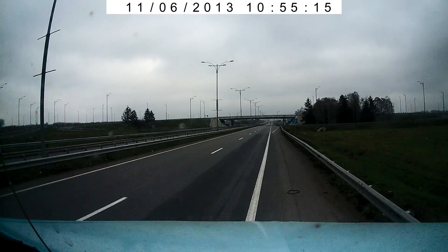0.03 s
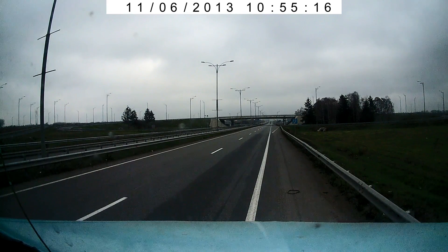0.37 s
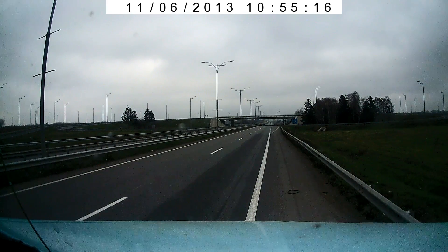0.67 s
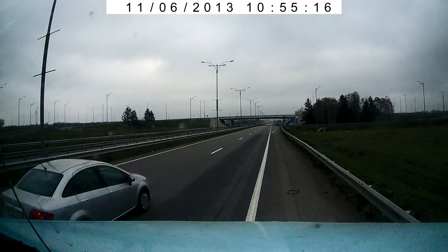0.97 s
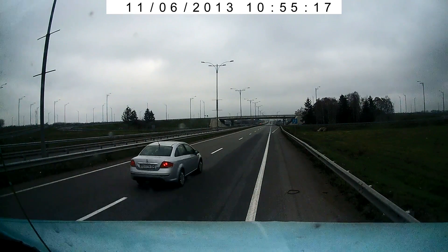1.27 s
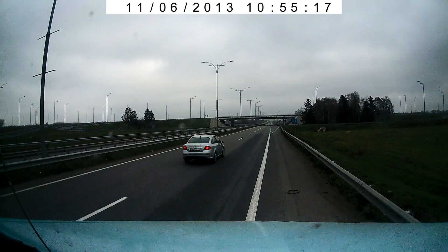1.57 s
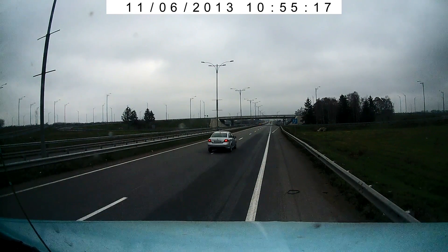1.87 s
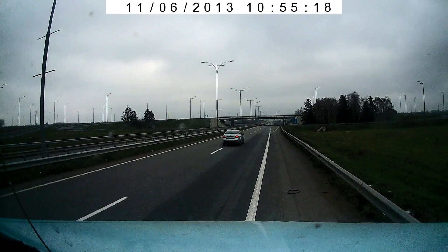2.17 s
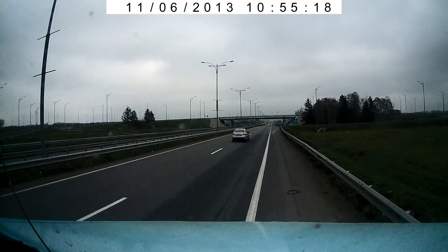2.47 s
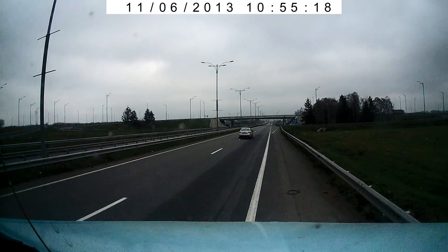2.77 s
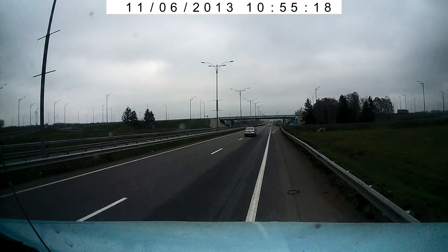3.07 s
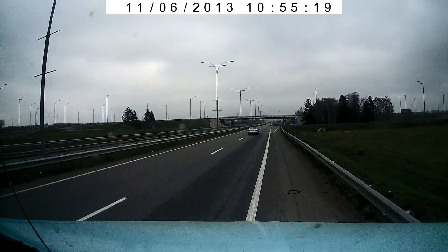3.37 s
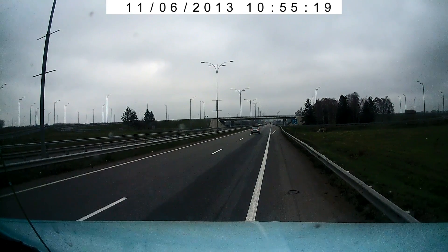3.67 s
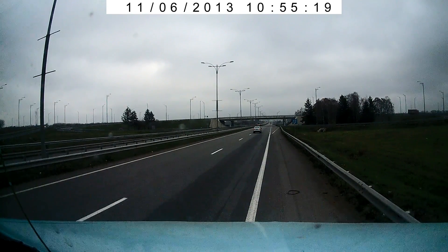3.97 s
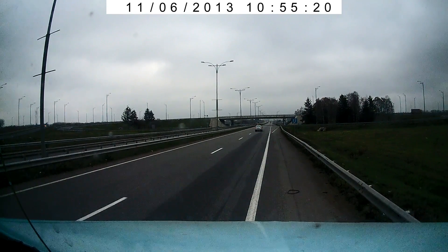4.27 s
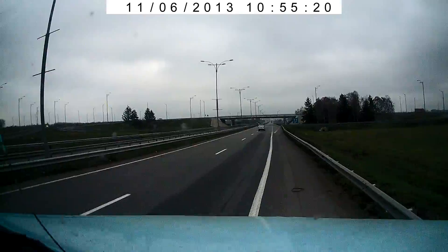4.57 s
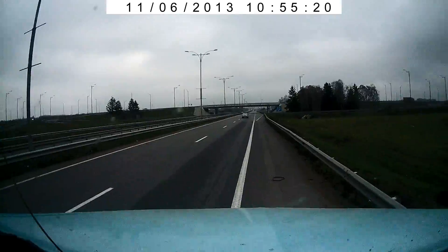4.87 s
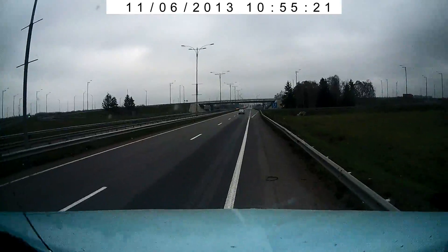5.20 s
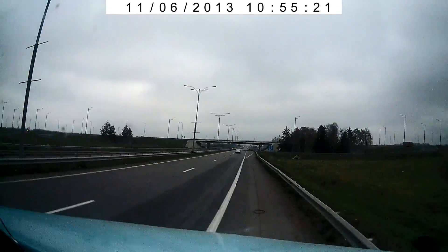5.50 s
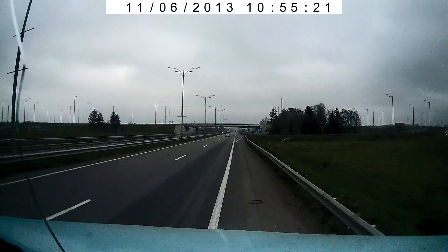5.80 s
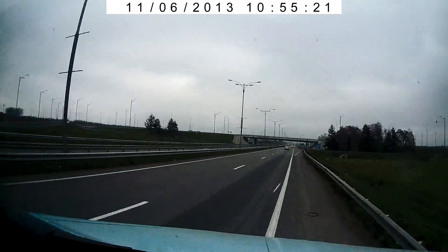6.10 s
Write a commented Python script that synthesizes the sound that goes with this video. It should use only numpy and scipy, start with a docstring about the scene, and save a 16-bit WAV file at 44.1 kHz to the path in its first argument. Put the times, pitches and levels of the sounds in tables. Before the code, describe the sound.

Faint cabin noise, hiss and a thin, high electronic whine run throughout, heard from a dashboard camera inside a standing car. Another car passes right away, its tyres soft and muffled through the glass, peaking at about 0.7 seconds, dropping slightly in pitch and fading by 2 seconds. At about 2.2 seconds a hand takes hold of the camera with a sharp plastic click. Until 4.5 seconds fingers slide over the case in short scrapes, with scattered ticks, light knocks and a faint low shudder, all very close to the microphone. At 4.6 and 4.75 seconds the toothed mount gives way in two bursts of hard snaps, the loudest sounds. The loose camera then rattles and knocks with a low rumble as it is turned. A stronger cluster of knocks and clicks comes around 5.6 seconds, followed by a few light taps near 6 seconds.

```python
"""A motorway shoulder, inside a quiet standing car, heard by a dashboard camera. Another car passes,
its tyres muffled by the glass. A hand takes hold of the camera: fingers slide over the plastic, contacts
tick and ring the case, and the toothed mount snaps loose and rattles as it is turned. All of it reaches
the built-in microphone through the case, over hiss and a faint electronic whine."""
import sys
import numpy as np
from scipy import signal
from scipy.fft import rfft, irfft
from scipy.io import wavfile
from scipy.ndimage import uniform_filter1d

SR = 44100
rng = np.random.default_rng(int(sys.argv[2]) if len(sys.argv) > 2 else 0)


def inscribe(sig):
    """Save sig as 16-bit PCM at rate SR to the path in sys.argv[1].

    A 1-D sig is mono; a 2-D sig holds one channel per row.
    Samples are clipped to [-1, 1] before scaling.
    """
    pcm = np.round(np.clip(np.atleast_2d(sig).T, -1, 1) * 32767)
    wavfile.write(sys.argv[1], SR, pcm.astype(np.int16))


N = 270774
LOOSE_FROM_S = 4.6  # the mount's joint is locked until then


def undb(db):
    """Decibels to gain."""
    return 10 ** (np.asarray(db) / 20)


def noise(colour, size=N):
    """Noise of rms 1, shaped by (frequency [Hz], level [dB]) points."""
    hz, db = np.transpose(colour)
    f = np.maximum(np.arange(size // 2 + 1) * SR / size, 1)
    gain = undb(np.interp(np.log(f), np.log(hz), db))
    skirts = np.minimum(f / hz[0], 1) * np.minimum(hz[-1] / f, 1) ** 2
    y = irfft(rfft(rng.standard_normal(size)) * gain * skirts, size)
    return y / y.std()


def wander(rate_hz):
    """Smooth random curve of spread 1."""
    step = max(int(SR / rate_hz), 1)
    y = uniform_filter1d(np.repeat(rng.standard_normal(N // step + 1), step), step)[:N]
    return y / y.std()


def gains(table, fade_s):
    """A table's dB columns as gain curves, fading outside its time span."""
    t = np.arange(N) / SR
    times, *columns = np.transpose(table)
    outside_s = np.abs(t - np.clip(t, times[0], times[-1]))
    return [undb(np.interp(t, times, db)) * np.exp(-outside_s / fade_s) for db in columns]


def decay(t, t60_s):
    """Envelope falling 60 dB in t60_s."""
    return np.exp(-np.log(1000) * t / t60_s)


def add(track, start_s, sound):
    """Mix a sound into a track."""
    i = int(start_s * SR)
    track[i:i + len(sound)] += sound[:len(track) - i]


# cabin noise and microphone hiss (frequency [Hz], relative level [dB])
CABIN_COLOUR = [(20, -5.5), (46, -1.5), (75, -12), (300, -12), (750, -16), (1200, -14), (1700, -19),
                (2700, -17), (5400, -24.5), (10000, -28), (16000, -29.5)]
# electronic whine (frequency [Hz], rms level [dB])
WHINE_TONES = [(7854, -91), (7881, -74.5), (15735, -83)]


def background(cabin_db=-61.5, waver_rad=0.19):
    """Steady cabin noise and hiss, with the beating whine of the camera's electronics."""
    t = np.arange(N) / SR
    whine = sum(np.sqrt(2) * undb(db) * np.sin(2 * np.pi * hz * t + waver_rad * wander(25))
                for hz, db in WHINE_TONES)
    return undb(cabin_db) * noise(CABIN_COLOUR) + whine


# pass-by (time [s], roar level [dB], tread hiss level [dB])
PASS_LEVELS = [(0.0, -61.5, -61), (0.24, -58, -55.5), (0.67, -49, -54), (1.11, -59, -61.5),
               (1.41, -62, -65.5), (1.85, -63.5, -69), (2.15, -68, -70)]
# tyre roar and tread hiss behind glass (frequency before Doppler [Hz], relative level [dB])
ROAR_COLOUR = [(200, -23), (500, -23.5), (750, -11), (900, -7), (1080, -5.5), (1270, -2.5), (1500, -12.5),
               (1900, -27.5), (3300, -15.5), (4100, -13.5), (5200, -26.5), (9000, -35.5)]
TREAD_COLOUR = [(1600, -12), (2200, 2.5), (2720, 8.5), (3100, 0.5), (3500, -14.5), (4200, -25), (5000, -31),
                (9000, -34)]
# narrow tyre howls (centre [s], half length [s], level [dB], frequency before Doppler [Hz])
HOWLS = [(0.114, 0.13, -57.5, 2700), (0.696, 0.14, -50, 1080)]


def passing_car(flutter_db=1.04, howl_oct=0.35, doppler=0.045, abreast_s=0.49, sweep_s=0.26):
    """Tyres through the windows: hiss on approach, a howling roar alongside, a long fade at lower pitch."""
    n = np.arange(N)
    t = n / SR
    roar, tread = gains(PASS_LEVELS, fade_s=1.6)
    layers = [(roar, ROAR_COLOUR), (tread, TREAD_COLOUR)]
    for centre_s, half_s, db, hz in HOWLS:
        swell = undb(db) * np.exp(-((t - centre_s) / half_s) ** 2)
        band = [(hz * 2 ** -howl_oct, -24), (hz, 0), (hz * 2 ** howl_oct, -24)]
        layers.append((swell, band))
    approach = (1 - np.tanh((t - abreast_s) / sweep_s)) / 2
    read_index = np.cumsum(1 + doppler * approach) % N  # the approach squeezes the waves
    return sum(swell * undb(flutter_db * wander(16)) * np.interp(read_index, n, noise(colour))
               for swell, colour in layers)


# squeezes of the locked mount (time [s], hold [s], relative tremor [dB], relative hum [dB])
SQUEEZES = [(2.227, 0.028, -47.5, -48), (2.476, 0.27, -49, -69), (2.9, .1, -54, -63),
            (3.079, 0.062, -54.5, -69), (3.433, 0.32, -55.5, -59), (3.708, 0.27, -61, -49.5),
            (4.048, 0.45, -64.5, -59.5), (4.459, 0.027, -41.5, -59)]
# tremor on the stiff mount (frequency [Hz], relative level [dB])
TREMOR_COLOUR = [(80, -14.5), (105, -3), (130, 11.5), (160, -12.5), (220, -13.5), (290, -2), (380, -20),
                 (500, -19), (1500, -43)]


def grip(tremor_db=-1, unsteady_db=3, hum_db=2, hum_hz=33.3, waver_rad=0.54, attack_s=0.019, t60_s=0.33):
    """Each squeeze shakes the stiff mount and passes a wavering low hum into it."""
    t = np.arange(N) / SR
    tremor_env, hum_env = np.zeros((2, N))
    for at_s, hold_s, shake_db, drone_db in SQUEEZES:
        attack = np.clip(1 + (t - at_s) / attack_s, 0, 1)
        squeeze = attack * decay(np.maximum(t - at_s - hold_s, 0), t60_s)
        tremor_env += undb(shake_db) * squeeze
        hum_env += undb(drone_db) * squeeze
    tremor = undb(tremor_db + unsteady_db * wander(47)) * tremor_env * noise(TREMOR_COLOUR)
    hum = undb(hum_db) * hum_env * np.sin(2 * np.pi * hum_hz * t + waver_rad * wander(22))
    return tremor + hum


# the hand turning the loose mount (time [s], relative level [dB])
TURN_LEVELS = [(4.62, -38), (4.762, -45), (5.094, -55), (5.592, -46), (5.808, -62), (6.14, -54.5)]
# sway of the loose camera (frequency [Hz], relative level [dB])
SWAY_COLOUR = [(10, 2.5), (22, 4), (45, -3.5), (70, -11.5), (98, -7), (130, -13), (220, -30), (450, -25.5),
               (900, -35.5)]


def sway(gain_db=2):
    """The loose camera sways with a low rumble as it is turned."""
    turning, = gains(TURN_LEVELS, fade_s=.01)
    return undb(gain_db) * turning * noise(SWAY_COLOUR)


def squeak(centre_s=.42, half_s=.04, level_db=-64, pitch_hz=5550, width_oct=.12):
    """Skin sticks and slips fast enough to give a thin, rough pitch."""
    t = np.arange(N) / SR
    band = [(pitch_hz * 2 ** -width_oct, -30), (pitch_hz, 0), (pitch_hz * 2 ** width_oct, -30)]
    return undb(level_db) * np.exp(-((t - centre_s) / half_s) ** 2) * noise(band)


# finger strokes (start [s], end [s], level [dB])
STROKES = [(.32, .452, -60), (2.552, 2.708, -62), (2.83, 2.997, -62), (3.08, 3.326, -61),
           (3.129, 3.181, -54), (3.255, 3.324, -59), (3.704, 3.8, -50.5), (3.843, 3.87, -51),
           (3.965, 4.05, -61.5), (4.067, 4.11, -54.5), (4.144, 4.157, -48.5), (4.221, 4.267, -52),
           (4.276, 4.332, -55.5), (4.331, 4.403, -49), (4.457, 4.513, -53), (4.676, 4.747, -52.5),
           (4.88, 4.89, -55), (4.936, 4.978, -60), (5.011, 5.036, -56.5), (5.223, 5.294, -60),
           (5.562, 5.607, -47), (5.648, 5.656, -50.5), (5.735, 5.793, -65.5)]
# finger roll and pressure (time [s], tip over pad [dB], relative scrape [dB])
FINGER_CONTACT = [(.4, -10, -3), (2.6, 3, 7.5), (3.15, 9, -3.5), (3.75, -8, 2), (4.1, 3, -3),
                  (4.35, -19.5, 0.5), (4.7, -16, 7), (5.6, -5.5, 7.5)]
# pad and tip on plastic, and their scrape resounding in the case (frequency [Hz], relative level [dB])
PAD_COLOUR = [(1200, -32.5), (2400, -16), (3200, -5), (4400, 0), (5000, -9.5), (5650, -1), (6200, -12.5),
              (7000, -15.5), (9000, -25), (16000, -32.5)]
TIP_COLOUR = [(2000, -27.5), (2700, -5.5), (3250, 3.5), (4000, -9.5), (4800, -17.5), (6200, -11.5),
              (7000, 0), (7650, -22.5), (8300, -7), (9500, -24.5), (16000, -35.5)]
SCRAPE_COLOUR = [(200, -1), (500, 1), (1200, -3), (1600, -3.5), (1820, 0.5), (1920, 14), (2030, -14.5),
                 (2400, -3.5), (4000, -33)]


def fingers(scrape_db=-1, edge_s=0.032, grain_db=2.5, catch_db=2):
    """Skin slides over the case in short strokes, catching and slipping in fine grains."""
    t = np.arange(N) / SR
    strokes = sum(undb(db) * np.clip(np.minimum(t - start_s, end_s - t) / edge_s + .5, 0, 1)
                  for start_s, end_s, db in STROKES)
    tip, pressure = gains(FINGER_CONTACT, fade_s=np.inf)
    friction = undb(grain_db * wander(1200) + catch_db * wander(70))
    skin = (noise(PAD_COLOUR) + tip * noise(TIP_COLOUR)) / np.hypot(1, tip)
    scrape = undb(scrape_db) * pressure * noise(SCRAPE_COLOUR)
    return strokes * (friction * skin + scrape)


# case modes, the mount's first (frequency [Hz], relative level [dB], t60 [s])
CASE_MODES = [(132, -2.5, 0.077), (44, -11, 0.12), (198.7, -10.5, 0.055), (262, -5.5, 0.032),
              (358, 2, 0.015), (472, -20.5, 0.057), (587.5, -12, 0.042), (687, -18, 0.04),
              (785, -12.5, 0.027), (936, -4, 0.012), (1170, -7, 0.016), (1297, -16.5, 0.02),
              (1612, -14.5, 0.026), (1814, -6, 0.019), (1910, -4.5, 0.064), (2280, -15, 0.025),
              (2542, -18.5, 0.031), (3044, -17.5, 0.014), (3260, -22, 0.047), (3340, -28.5, 0.011),
              (3697, -14, 0.02), (3885, -36.5, 0.071), (4530, -40.5, 0.015), (6400, -42, 0.022),
              (8000, -43, 0.0073), (8180, -40, .02)]


def case_ring(t, locked, thud_db, knock_db, ring_db, tick_db, loose_hz=97.7, loose_db=-5, scatter_db=2):
    """Struck case modes, driven in four bands; the mount's mode is lower and weaker once loose."""
    hz, db, t60_s = np.transpose(CASE_MODES)
    envelopes = undb(db)[:, None] * decay(t, t60_s[:, None])
    envelopes[0] *= -1 if locked else -undb(loose_db)  # the mount swings against the case
    drive_db = np.interp(hz, [340, 450, 1500, 1800, 2050, 2900],
                         [thud_db, knock_db, knock_db, ring_db, ring_db, tick_db])
    detune, scatter, offset_rad = rng.standard_normal((3, len(hz)))
    held = 1 / (1 + (hz / 900) ** 4)  # the shifting grip retunes the low modes only
    pitch_hz = np.r_[hz[0] if locked else loose_hz, hz[1:]] * (1 + 0.03 * held * detune)
    phase = 2 * np.pi * pitch_hz[:, None] * t + (held * offset_rad)[:, None]
    onset = 1 - np.exp(-4 * pitch_hz[:, None] * t)
    return undb(drive_db + scatter_db * scatter) @ (envelopes * np.sin(phase) * onset)


# crack at a contact (frequency [Hz], relative level [dB])
CRACK_COLOUR = [(300, -21.5), (1500, -16), (2800, 6), (4200, -3), (5600, 2.5), (6600, -5), (8200, -1.5),
                (9800, -12.5), (16000, -15.5)]


def strike(at_s, thud_db, knock_db, ring_db, tick_db, tick_hz, bounce_db=-10, brighten_oct_per_db=0.034):
    """One contact ticks, cracks and rings the case; the plastic parts bounce once."""
    t = np.arange(8192) / SR
    locked = at_s < LOOSE_FROM_S
    body = case_ring(t, locked, thud_db, knock_db, ring_db, tick_db)
    tick = undb(-1) * np.sin(2 * np.pi * tick_hz * t) * decay(t, t60_s=0.0042)
    crack_env = undb(-10) * decay(t, t60_s=0.0083) + undb(-27) * decay(t, t60_s=0.028)
    crack = crack_env * noise(CRACK_COLOUR, len(t))
    # a harder contact is shorter, so it reaches further into the treble
    brightness = (1.9 if locked else 2.22) * 2 ** (brighten_oct_per_db * (tick_db + 20))
    lowpass = signal.butter(2, min(brightness * tick_hz, SR / 3), fs=SR)
    contact = undb(tick_db) * signal.lfilter(*lowpass, tick + crack)
    add(body, rng.uniform(0.0012, 0.0026), undb(bounce_db) * contact)
    return body + contact


def click(at_s, tick_db, ring_db, tick_hz):
    """A light, hard contact: tick and shell ring, barely moving the body."""
    thud_db, knock_db = tick_db - 25, tick_db - 29
    return strike(at_s, thud_db, knock_db, ring_db, tick_db, tick_hz)


def knock(at_s, db, weight_db, hardness_db):
    """A blow on the whole body: weight adds thud and damps the shell, hardness adds tick and ring."""
    ring_db = db - 8 + 0.33 * hardness_db - 0.23 * weight_db
    tick_hz = 3900 if at_s < LOOSE_FROM_S else 2857
    return strike(at_s, db + weight_db, db, ring_db, db + hardness_db, tick_hz)


def rattle(over_turn_db=3, spread_db=3, count=24):
    """The loose joint rattles faintly at random, as strongly as the camera is being turned."""
    out = np.zeros(N)
    turn_s, turn_db = np.transpose(TURN_LEVELS)
    for k, (late, size) in enumerate(rng.random((count, 2))):
        at_s = LOOSE_FROM_S + (N / SR - LOOSE_FROM_S) * (k + late) / count
        db = np.interp(at_s, turn_s, turn_db) + over_turn_db + spread_db * (2 * size - 1)
        add(out, at_s, knock(at_s, db, weight_db=-4, hardness_db=-6))
    return out


# nail or plastic edge on the case (time [s], tick drive [dB], ring drive [dB], tick pitch [Hz])
CLICKS = [(1.168, -32.5, -55, 5300), (2.222, -28, -42, 3220), (2.244, -23, -34, 3900),
          (2.2502, -9, -19, 4090), (2.4194, -36, -48.5, 3430), (2.4724, -21.5, -35, 3770),
          (2.7117, -18.5, -42, 3350), (3.058, -35.5, -62, 3860), (3.1311, -20, -89, 4150),
          (3.97, -24, -60, 3100), (4.1475, -37, -63, 3970), (4.2392, -25, -45, 3420),
          (4.6095, -26, -39, 2500), (4.7874, -24.5, -34, 4160), (5.2572, -20.5, -29, 2910),
          (5.608, -15, -38, 3870), (5.664, -22, -39, 3870)]
# knocks of the hand and of play in the mount (time [s], drive [dB], weight [dB], hardness [dB])
KNOCKS = [(2.2817, -36, -2.5, 2.5), (2.4306, -43.5, -4, -2), (2.48, -32, 2.5, 10), (2.4891, -31, -38, 6),
          (2.7121, -30.5, -0.5, -3), (2.7351, -37.5, -7, 0), (2.7979, -28.5, -45, -5),
          (2.9158, -30.5, -8, -10.5), (3.0995, -41, -19, -21), (3.54, -56.5, 13, 8),
          (3.728, -28.5, -14, -8), (3.7394, -34, -11, -6), (3.764, -33.5, -13, 0.5),
          (3.8815, -36, -6.5, -1), (3.9029, -35, -5.5, -1), (3.9198, -44, -2, 3), (3.948, -34, -21, -9),
          (4.0674, -35, -20, 2.5), (4.2021, -30.5, -23, -1), (4.2868, -38, -11, 5), (4.3895, -31, -16, -28),
          (4.5552, -42, -31, -3), (4.5903, -39, -23, -3), (4.619, -18.5, -1, -3), (4.6583, -20.5, -6, -8),
          (4.8304, -35, 3.5, -5.5), (4.8770, -39, 16.5, 0), (4.8931, -28.5, 4.5, -9),
          (4.9272, -34.5, 2, -3), (4.9516, -41, 6.5, -2), (4.9922, -42, -17, -5), (5.0112, -33, 4.5, -3.5),
          (5.0204, -34.5, -26, -9), (5.0853, -32.5, -25, -1), (5.158, -38, -9, 5.5), (5.2144, -32, -19, 0),
          (5.259, -27, -5, 0.5), (5.2819, -45.5, 16.5, -10), (5.3087, -31.5, -27, -2),
          (5.4362, -38, -1, -8), (5.4857, -41.5, 11.5, 3), (5.551, -29, 0, 1.5), (5.5592, -29.5, 15, 0),
          (5.5701, -13, -29, 0.5), (5.589, -26, 0, -16), (5.6064, -27.5, 2.5, 2), (5.6129, -20, -1, -8),
          (5.6714, -22, -3.5, -3.5), (5.6992, -41.5, 8, 8), (5.7131, -26.5, 3, -1.5),
          (5.9831, -37.5, 3, -6), (6.0588, -48, 2, -3)]


def handling():
    """Single clicks and knocks as the hand takes hold and turns the camera."""
    out = np.zeros(N)
    for at_s, tick_db, ring_db, tick_hz in CLICKS:
        add(out, at_s, click(at_s, tick_db, ring_db, tick_hz))
    for at_s, db, weight_db, hardness_db in KNOCKS:
        add(out, at_s, knock(at_s, db, weight_db, hardness_db))
    return out


# tooth jumps, two bursts of three (time [s], drive [dB], weight [dB], hardness [dB])
SNAPS = [(4.6245, 0, -17, 1), (4.6302, -10.5, -7.5, 5), (4.6411, -12, -1, -2), (4.7503, -0.5, -9.5, -2),
         (4.764, -16, -0.5, 9.5), (4.7708, -24.5, -2, 3.5)]


def joint_snaps(rebounds=4, gap_s=.0022, loss_db=4, ring_offset_db=-8.5, chatter_hz=3900, jitter=.2):
    """The toothed joint gives way: each snap is a hard knock, then a chatter of fading rebounds."""
    out = np.zeros(N)
    for at_s, db, weight_db, hardness_db in SNAPS:
        add(out, at_s, knock(at_s, db, weight_db, hardness_db))
        for k, (late, detune) in enumerate(rng.uniform(-0.8, 1, (rebounds, 2)), 1):
            rebound_s = at_s + gap_s * (k + jitter * late)
            tick_db = db + hardness_db - loss_db * k
            tick_hz = chatter_hz * (1 + jitter * detune)
            add(out, rebound_s, click(rebound_s, tick_db, tick_db + ring_offset_db, tick_hz))
    return out


def scene():
    """Mono sum at the microphone."""
    contacts = handling() + joint_snaps() + rattle()
    hand = fingers() + squeak() + grip() + sway()
    return (contacts + hand + passing_car() + background())[None]


def record(dry, ceiling=.71, top_hz=16200):
    """The hardest snaps overload the input; the top is cut."""
    clipped = dry / (1 + (dry / ceiling) ** 8) ** (1 / 8)
    lowpass = signal.ellip(8, .2, 70, top_hz, fs=SR, output="sos")
    return signal.sosfilt(lowpass, clipped)


dry = scene()
out = record(dry)
inscribe(out)
```